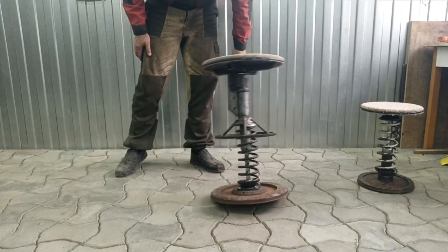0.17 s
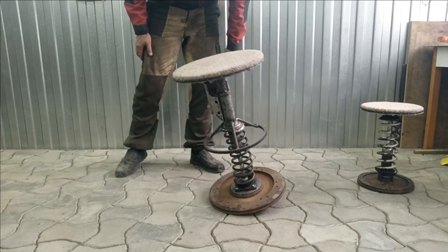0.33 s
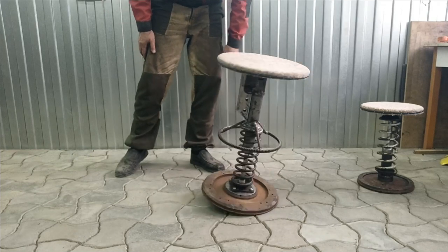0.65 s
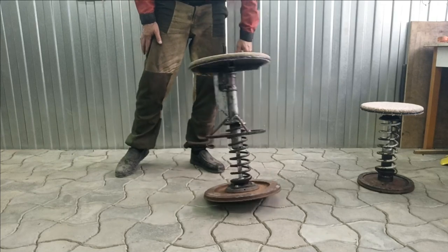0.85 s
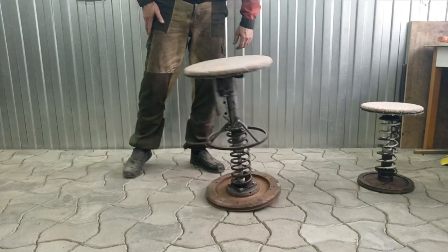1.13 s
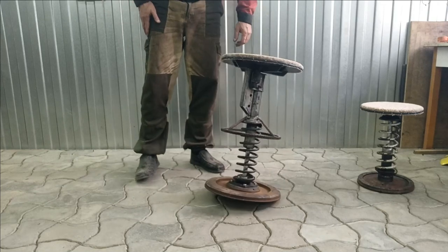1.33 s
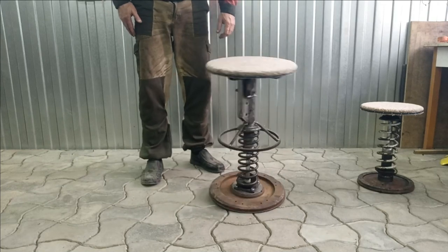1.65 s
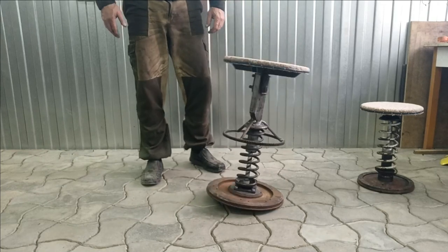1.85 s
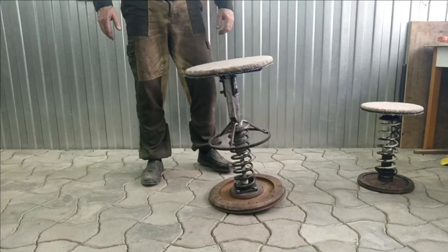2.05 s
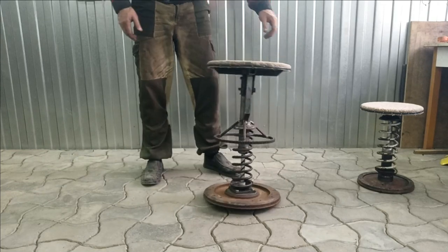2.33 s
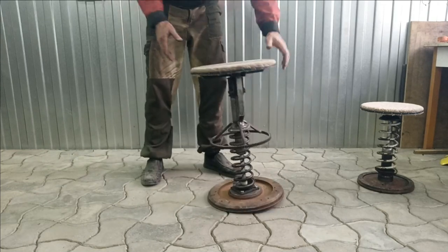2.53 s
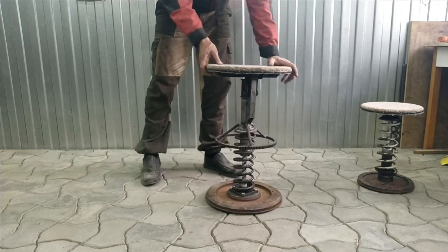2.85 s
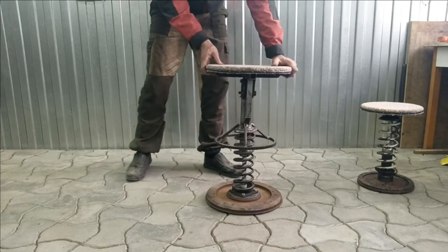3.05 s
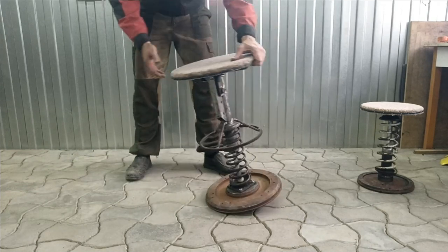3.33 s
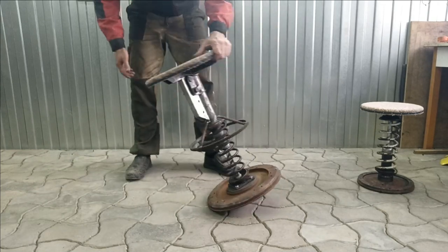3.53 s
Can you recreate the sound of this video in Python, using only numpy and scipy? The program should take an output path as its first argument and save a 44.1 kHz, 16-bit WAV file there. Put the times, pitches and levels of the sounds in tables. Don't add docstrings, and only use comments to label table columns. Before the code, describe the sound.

A heavy steel disc wobbles and clatters on its rim over concrete pavers, ringing, then lands flat.

```python
import sys
import numpy as np
from scipy import signal
from scipy.fft import rfft, irfft, next_fast_len
from scipy.io import wavfile
from scipy.ndimage import uniform_filter1d, minimum_filter1d

SR = 44100
rng = np.random.default_rng(int(sys.argv[2]) if len(sys.argv) > 2 else 0)


def gain_from_db(level_db):
    decades = np.asarray(level_db, float) / 20
    return 10 ** decades


def materialize(psi):
    bounded = np.clip(np.atleast_2d(psi).T, -1, 1)
    quanta = np.round(bounded * 32767).astype(np.int16)
    wavfile.write(sys.argv[1], SR, quanta)


N = 160965
BASS_HZ, TREBLE_HZ = 733, 1840

# pitch_hz, width_hz, level_db
BODY = [(207, 54, -15.5), (273.8, 52, -10.5), (366, 23, -8), (470, 50, 1), (631.5, 68, -7), (927, 227, 0),
        (1685, 212, 4.5), (2640, 90, 5), (4000, 81, -3), (4750, 39, 2), (5570, 120, -24.5), (6750, 86, 22),
        (7320, 76, 23), (8350, 180, -8.5)]


def at_hz(points, hz):
    pitch, value = np.transpose(points)
    return np.interp(np.log(hz), np.log(pitch), value)


def convolve(x, h):
    size = next_fast_len(2 * N)
    return irfft(rfft(x, size) * rfft(h, size), size)[:N]


def coloured(x, points):
    size = 8192
    hz = np.maximum(np.arange(size // 2 + 1), 1) * SR / size
    log_gain = at_hz(points, hz) * np.log(10) / 20
    cepstrum = irfft(log_gain, size)
    cepstrum[1:size // 2] *= 2
    cepstrum[size // 2 + 1:] = 0
    response = irfft(np.exp(rfft(cepstrum)), size)
    return convolve(x, response[:size // 2])


def rms_one(x):
    return x / np.sqrt(np.mean(x ** 2) + 1e-20)


def drift(rate):
    r = np.exp(-2 * np.pi * rate / SR)
    wander = signal.lfilter([1], [1, -2 * r, r * r], rng.standard_normal(N + SR))
    return rms_one(wander[SR:])


def sway():
    return gain_from_db(2 * drift(6))


def grains(rate, spread_db):
    sizes = gain_from_db(spread_db * np.minimum(rng.exponential(1, N), 4)) * rng.choice([-1, 1], N)
    return rms_one(sizes * (rng.random(N) < rate / SR))


def resonate(x, hz, width):
    r = np.exp(-np.pi * width / SR)
    top_gain = np.array([1, 0, -1]) * (1 - r * r) / 2
    return signal.lfilter(top_gain, [1, -2 * r * np.cos(2 * np.pi * hz / SR), r * r], x + 1e-18)


def contact(rows, bass_share=0):
    t, load = np.arange(N) / SR, np.zeros(N)
    lift_s = 0.059
    for start, rise, hold, db, *bass_db in rows:
        rise = max(rise, 1e-3)
        press = np.clip((t - start) / rise, 0, 1)
        lift = np.exp(-np.maximum(t - start - rise - hold, 0) / lift_s)
        load += gain_from_db(db + bass_share * sum(bass_db)) * press * lift
    return load


def still_air():
    # pitch_hz, level_db
    air_colour = [(40, -10), (90, 1), (250, -5.5), (900, -7.5), (2200, -23.5), (5000, -38.5), (7500, -30),
                  (9000, -52.5)]
    return gain_from_db(-40) * rms_one(coloured(rng.standard_normal(N), air_colour))


def hiss():
    high = signal.butter(10, 12100, "high", fs=SR, output="sos")
    return gain_from_db(-63.5) * signal.sosfilt(high, rng.standard_normal(N))


def yard(x):
    # pitch_hz, t60_s (time to fall 60 dB)
    wall_decay = [(100, 0.65), (500, 0.7), (2000, 1), (5000, 0.9), (12000, 0.24)]
    first_echo_s, wobble_per_s = 0.0046, 2.395
    t, out = np.arange(SR) / SR, 0
    level = np.sqrt(np.log(1000) / wall_decay[1][1] / SR)
    for side in range(3):
        tail = 0
        for low in 40 * 2 ** np.arange(0, 9.):
            octave = signal.butter(2, [low, min(2 * low, .45 * SR)], "band", fs=SR, output="sos")
            fade = gain_from_db(-60 * t / at_hz(wall_decay, low * np.sqrt(2)))
            tail = tail + signal.sosfilt(octave, rng.standard_normal(SR)) * fade
        tail = tail * np.clip(t / first_echo_s - 1, 0, 1)
        turn = wobble_per_s / 2 * np.arange(N) / SR + side / 3
        facing = np.abs(np.cos(np.pi * turn))
        out = out + convolve(x * facing, tail * level)
    return gain_from_db(-1.5) * out


def snaps():
    # start_s, tip_db, clack_db
    edge_snaps = [(0.0005, -33, -41), (0.232, -41, -36), (0.2781, -24, -22), (.8066, -32, -31),
                  (.8275, -37.5, -48), (0.853, -44, -36), (.8654, -42, -45), (0.909, -27.5, -18),
                  (1.2918, -35, -20), (1.334, -38, -44), (1.3558, -48, -51), (1.3773, -47, -41),
                  (2.0307, -38, -21), (2.1192, -41, -46), (2.4089, -38, -46), (2.4289, -36, -45),
                  (2.4882, -28, -35), (2.8184, -25.5, -34), (2.8799, -45, -30), (3.1845, -40, -32)]
    start_s, tip_db, clack_db = np.transpose(edge_snaps)
    out = 0
    for order, db, band_hz in ((1, tip_db, [2490, 9900]), (2, clack_db, [3000, 7500])):
        clicks = np.zeros(N)
        clicks[(start_s * SR).astype(int)] = gain_from_db(db + 9.5)
        band = signal.butter(order, band_hz, "band", fs=SR, output="sos")
        out = out + signal.sosfilt(band, clicks + 1e-18)
    return out


def pings():
    # start_s, pitch_hz, level_db, t60_s (time to fall 60 dB)
    tones = [(.281, 2660, -28.5, 0.82), (.625, 7300, -55, 0.16), (.81, 2640, -22, 0.25),
             (1.336, 2624, -23.5, 0.55), (1.397, 2680, -19, 0.48), (1.601, 6750, -47.5, 0.19),
             (1.784, 3985, -36.5, 0.29), (1.864, 3960, -47.5, 0.26), (2.142, 4620, -48, 0.4),
             (0.851, 4000, -42.5, 0.16), (3.179, 2610, -19.5, 0.44), (0.001, 499, -19, 0.11),
             (.812, 982, -10.5, .12), (.848, 962, -11.5, .12), (1.3, 970, -15, 0.56),
             (1.662, 492, -20.5, 0.12), (1.715, 488, -14, 0.14), (1.806, 482.9, -12, 0.29),
             (2.116, 981, -11.5, .2), (2.398, 978, -10, 0.11), (2.41, 2680, -18.5, 0.064),
             (2.685, 477, -4, 0.14), (2.768, 445, -4, 0.13), (2.915, 2734, -24, 0.12),
             (3.177, 536, -7, 0.065), (2.035, 3970, -47, 0.2), (2.39, 4100, -43, 0.23),
             (2.529, 5640, -49, 0.29)]
    twin_below_hz = 68.3
    flutter_db, wander_rad, rise_cycles = 3.5, 0.9, 4
    out, t = np.zeros(N + SR), np.arange(SR) / SR
    for start, hz, db, t60 in tones:
        first, wander = int(start * SR), drift(30)
        phase = 2 * np.pi * hz * t + wander_rad * wander[-SR:]
        pair = np.sin(phase) + .5 * np.sin(phase - 2 * np.pi * twin_below_hz * t)
        fade = gain_from_db(db - 60 * t / t60 + flutter_db * wander[:SR])
        out[first:first + SR] += fade * np.minimum(t * hz / rise_cycles, 1) * pair
    return out[:N]


def scrape():
    # start_s, rise_s, hold_s, level_db
    slides = [(0.0, 0.0023, 0.016, -77), (.26, 0.093, 0.038, -52), (.715, 0.031, .15, -51),
              (.95, 0.075, 0.11, -48), (1.29, 0.0081, 0.099, -50), (1.6, 0.0025, 0.065, -52),
              (1.78, .01, .06, -57), (2.062, 0.0021, 0.085, -47.5), (2.38, 0.0035, 0.021, -53),
              (2.5, 0.14, 0.31, -46.5), (3.148, .005, 0.04, -43.5), (3.635, 0.004, .05, -51)]
    # pitch_hz, level_db
    grit_colour = [(2500, 7.5), (4000, -8.5), (7400, 4), (8500, -14), (8900, -32), (11400, -37.5),
                   (11700, -15), (15500, -16.5)]
    grit = contact(slides) * grains(9000, 2.5)
    steel = sum(resonate(grit * sway(), hz, width) for hz, width, db in BODY if hz > TREBLE_HZ)
    return 2 * coloured(grit + gain_from_db(3.5) * steel, [(100, -53.5)] + grit_colour)


def knocks(pitches):
    # start_s, peak_db, bass_db, treble_db
    joint_hits = [(.155, -15.5, 10, 2.5), (0.2323, 7, 1, -1), (.279, 6, -5.5, -3.5), (.351, 8.5, -2, -6.5),
                  (.396, 5, 8, -4.5), (0.542, -4, 1.5, -6.5), (.714, -1, 0, 4.5), (.756, -4.5, 13.5, 0),
                  (0.805, 6.5, 8, 10), (.815, 6, -0.5, -3), (0.828, 1.5, -3, -3.5), (.851, -9, -1.5, 8.5),
                  (0.867, 0.5, -2.5, -16.5), (.909, 5.5, -13, -4.5), (0.961, -5.5, 4, -7),
                  (1.027, -0.5, 6, -5.5), (1.08, 6, 5, -8), (1.139, -9.5, 1, 2.5), (1.29, 10.5, -1, 1),
                  (1.332, 14.5, 2, -3.5), (1.377, 1, -18, 3.5), (1.425, 4, -7.5, -8.5),
                  (1.601, -11.5, -0.5, 19.5), (1.668, -12, 8.5, 3.5), (1.71, -17, 7, -6),
                  (1.781, -6.5, -7, 7.5), (1.8, -1.5, -4, 3.5), (2.031, 6, -8, 2.5), (2.057, 1, 5.5, -5.5),
                  (2.117, 5, 1.5, -6.5), (2.15, -2.5, -0.5, -5), (2.341, -9.5, 8, 2.5),
                  (2.385, 4.5, -2, 9.5), (2.408, 1, -0.5, -3.5), (2.424, -0.5, -5.5, 5.5),
                  (2.486, 5, -8, -2.5), (2.531, 2, -2, 4), (2.64, -7.5, -4.5, 3.5), (2.681, -2.5, 9.5, 1),
                  (2.745, -4, 4.5, 1), (2.77, -8.5, 13, -0.5), (2.795, -5, 4.5, 0),
                  (2.819, 8.5, -5.5, -2.5), (2.845, 8, -5.5, -15), (2.879, 12.5, 2, 6.5),
                  (2.912, -2.5, 0, 1), (3.168, 3, -8.5, -14.5), (3.177, 3.5, 4.5, 13.5),
                  (3.242, -9.5, -3, 7), (3.296, -12.5, 0, 15)]
    rattle_s, rattle_db, tilt_range_db, scatter_db = 0.008, -22.5, 12, 1.5
    start_s, db, bass_db, treble_db = np.transpose(joint_hits)
    scatter = rng.normal(0, scatter_db, (len(db), len(pitches)))
    trains = np.zeros((len(pitches), N))
    for k, hz in enumerate(pitches):
        tilt_db = bass_db * (hz < BASS_HZ) + treble_db * (hz > TREBLE_HZ)
        tilt_db = np.clip(tilt_db, -tilt_range_db, tilt_range_db)
        trains[k, (start_s * SR).astype(int)] = gain_from_db(db + 6.5 + tilt_db + scatter[:, k])
    fading = signal.lfilter([1], [1, -np.exp(-1 / (rattle_s * SR))], trains + 1e-18)
    chatter = fading * grains(4000, 2.57)
    return gain_from_db(rattle_db) * chatter - trains


def disc():
    # start_s, rise_s, hold_s, rumble_db, bass_db
    rolls = [(0.0, 0.00094, 0.0054, -28, 0), (.155, 0.01, 0.14, -35.5, 12), (0.225, 0.13, 0.082, -14.5, 1),
             (0.708, 0.012, 0.12, -13.5, 1), (.94, 0.032, 0.04, -11.5, -4),
             (1.06, 0.0067, 0.15, -21.5, 6.5), (1.291, 0.0019, 0.15, -13, 0.5),
             (1.5, 0.0063, 0.18, -26, 6.5), (1.65, 0.022, 0.15, -29.5, 12), (1.782, 0.011, 0.033, -27, 3),
             (2.028, 0.039, 0.084, -11.5, 2.5), (2.342, 0.0037, 0.048, -13.5, 4.5),
             (2.385, 0.004, 0.035, -19, -4), (2.502, 0.11, 0.038, -13, 2.5),
             (2.64, 0.076, 0.21, -16.5, 4.5), (3.176, 0.0016, 0.04, -14, -2.5),
             (3.623, 0.0068, 0.098, -48, 7)]
    # pitch_hz, level_db, t60_s (time to fall 60 dB)
    ring = [(463, -0.5, 0.31), (489.6, 2.5, 0.091), (555, 0, 0.06), (652, -4, 0.13), (815, -6.5, 0.11),
            (902, -2.5, 0.28), (970, 4.5, 0.25), (1034, 5, 0.6), (1070, -9.5, 0.21), (1603, -5.5, 0.3),
            (2700, -3, 0.34), (2590, 5, 0.12), (3890, -10.5, 0.19), (4660, 12, 0.081)]
    # pitch_hz, level_db
    contact_colour = [(50, -20.5), (120, -15), (400, -7), (1200, -10.5), (2300, -26.5), (4300, -35),
                      (5200, -55.5), (8000, -77)]
    # pitch_hz, level_db
    flat_ring = [(200, -7.5), (470, -2), (650, 6.5), (950, -8), (1700, -5.5), (2600, 2.5), (4000, 4.5),
                 (7000, -0.5)]
    # pitch_hz, width_hz, level_db
    flat_body = [(569, 130, -4.5), (1238, 160, -6), (1430, 90, -1), (1600, 52, 4), (2105, 200, 0.5),
                 (3700, 240, -2)]
    flat_s, flat_slap_db, direct_db, ring_db = 3.172, 5.5, -9.5, -6.5
    bumps = 10 * gain_from_db(1.3 * drift(40)) * grains(800, 2.7)
    bass_rumble = contact(rolls, bass_share=0.98) * bumps
    rumble = contact(rolls) * bumps

    direct = [("low", BASS_HZ), ("band", [BASS_HZ, TREBLE_HZ]), ("high", TREBLE_HZ)]
    narrow = [(hz, np.log(1000) / np.pi / t60, db + ring_db) for hz, db, t60 in ring]
    modes = BODY + narrow
    pitches = [BASS_HZ / 2, BASS_HZ * 2, TREBLE_HZ * 2] + [row[0] for row in modes]
    blows, out = 20 * knocks(pitches), 0
    for k, pitch in enumerate(pitches):
        force = blows[k] + (bass_rumble if pitch < BASS_HZ else rumble) * sway()
        flat_db = flat_slap_db if k < len(direct) else at_hz(flat_ring, pitch)
        force[int(flat_s * SR):] *= gain_from_db(flat_db)
        if k >= len(direct):
            hz, width, db = modes[k - len(direct)]
            out = out + gain_from_db(db) * resonate(force, hz, width)
            continue
        kind, edge_hz = direct[k]
        direct_band = signal.butter(2, edge_hz, kind, fs=SR, output="sos")
        out = out + gain_from_db(direct_db) * signal.sosfilt(direct_band, force)
        if kind == "band":
            landed = force * (np.arange(N) > flat_s * SR)
            out = out + sum(gain_from_db(db) * resonate(landed, hz, width) for hz, width, db in flat_body)
    return coloured(out, contact_colour)


def scene():
    near = disc() + scrape() + pings()
    return (near + yard(near) + still_air() + hiss() + snaps())[None]


def band_limit(x):
    return signal.sosfilt(signal.butter(12, 16500, fs=SR, output="sos"), x)


def record(dry):
    limit_s, ceiling_db = 0.0037, -0.07
    top_cut = signal.cheby2(24, 40, 15900, fs=SR, output="sos")
    bass_cut = signal.butter(3, 84, "high", fs=SR, output="sos")
    x = signal.sosfilt(top_cut, dry)
    span = int(limit_s * SR) + 2
    needed = np.minimum(1, gain_from_db(ceiling_db) / (np.abs(x) + 1e-9))
    gain = minimum_filter1d(needed, size=span, axis=1)
    gain = uniform_filter1d(gain, size=span // 2, axis=1)
    x = signal.sosfilt(bass_cut, x * gain)
    return band_limit(np.clip(x, -1, 1))


dry = scene()
out = record(dry)
materialize(out)
```